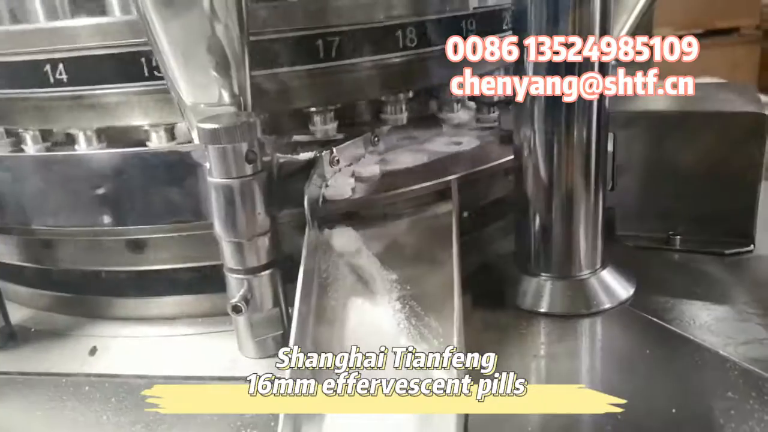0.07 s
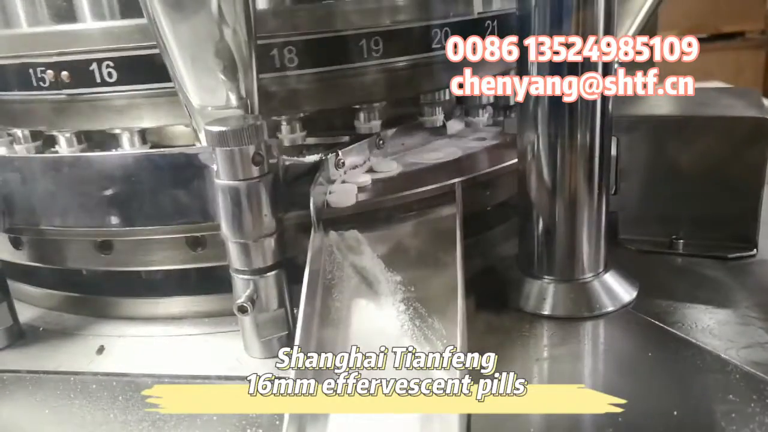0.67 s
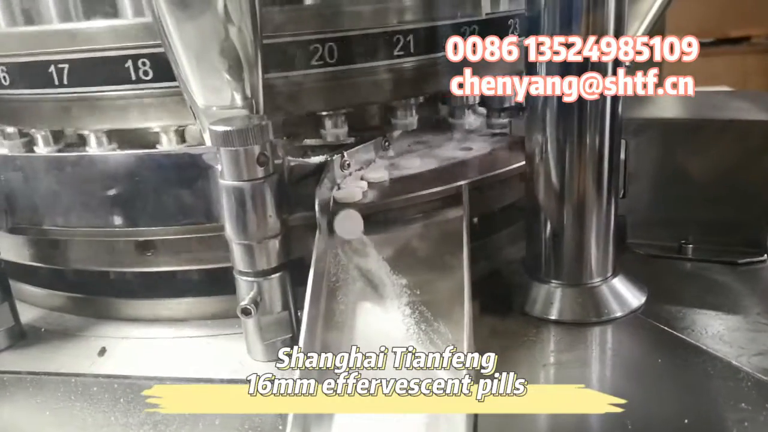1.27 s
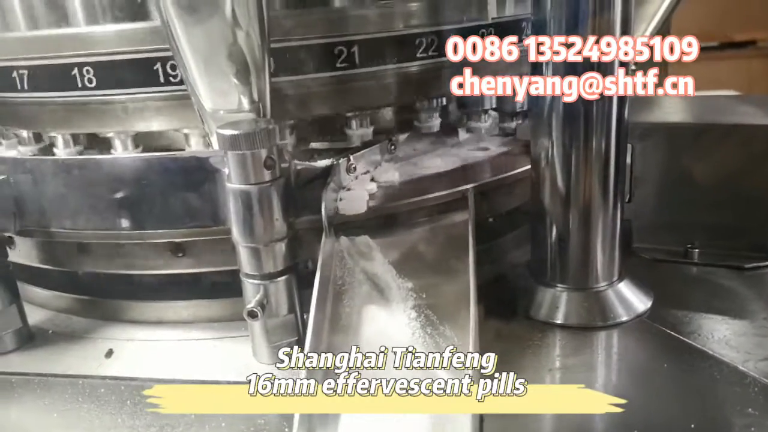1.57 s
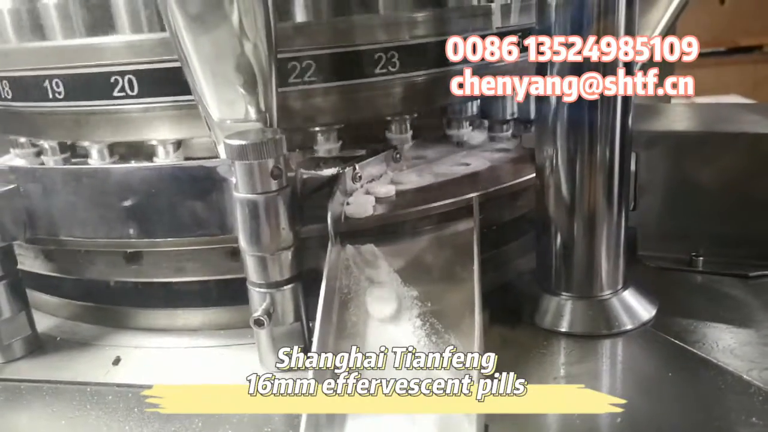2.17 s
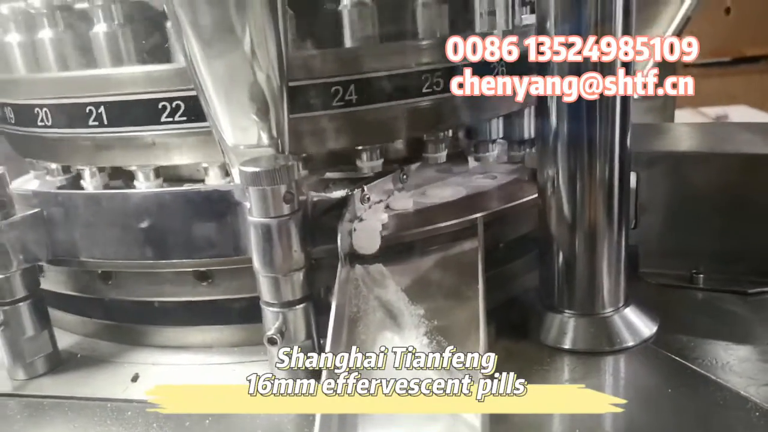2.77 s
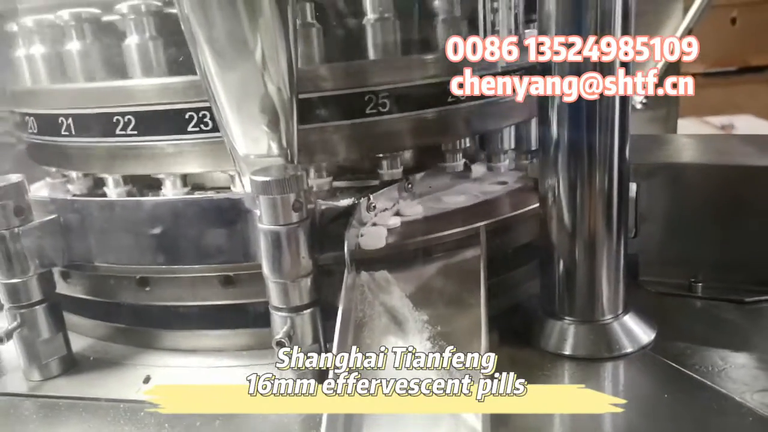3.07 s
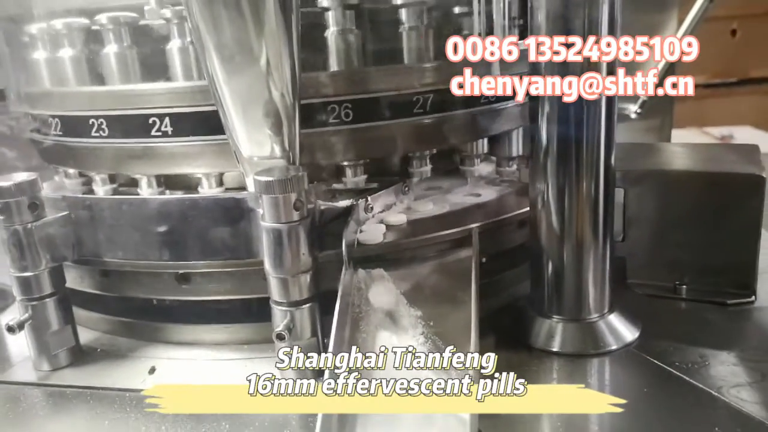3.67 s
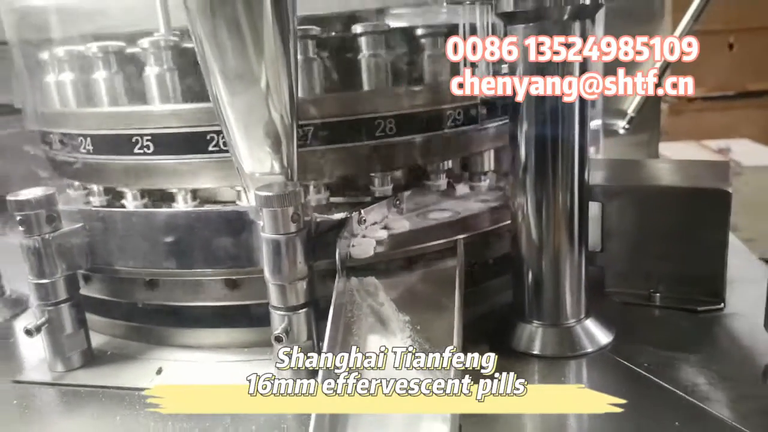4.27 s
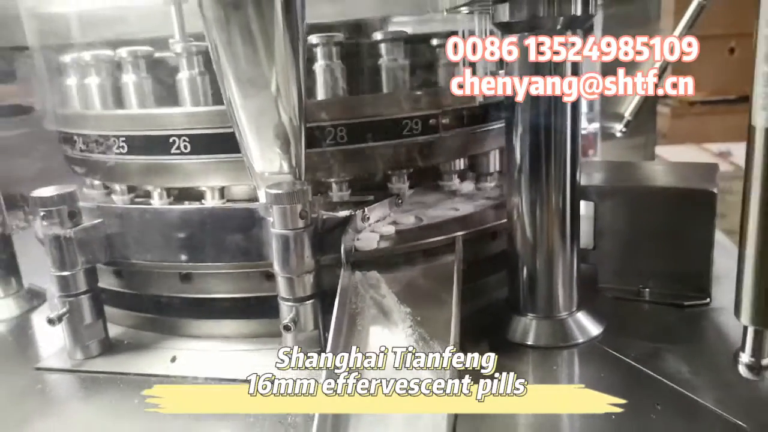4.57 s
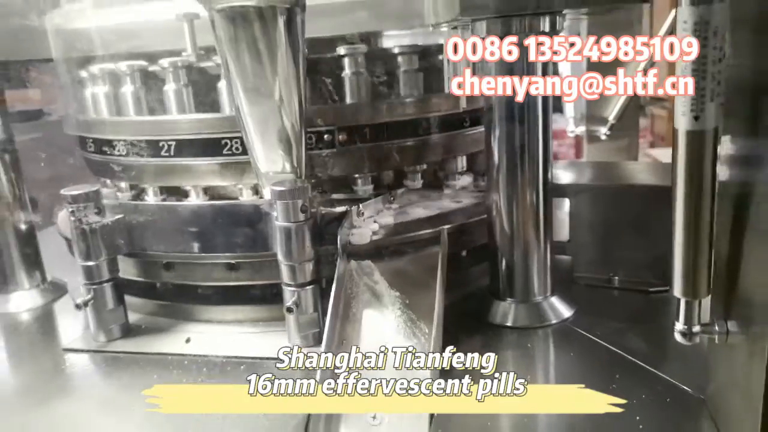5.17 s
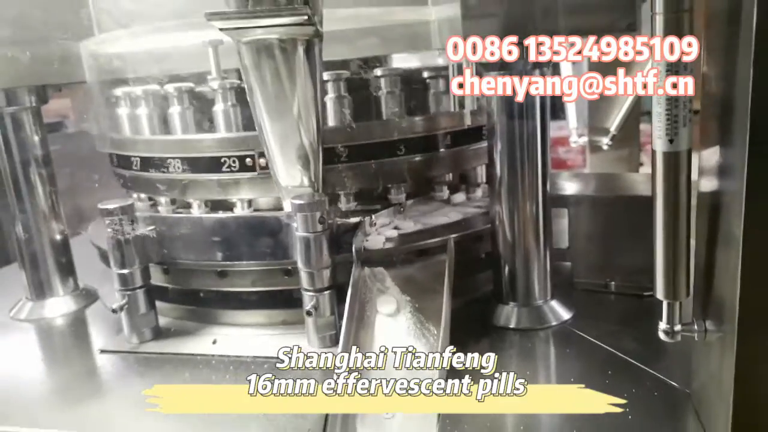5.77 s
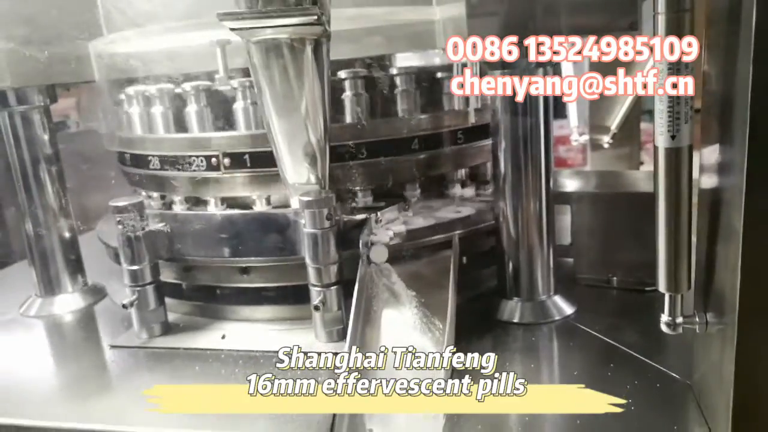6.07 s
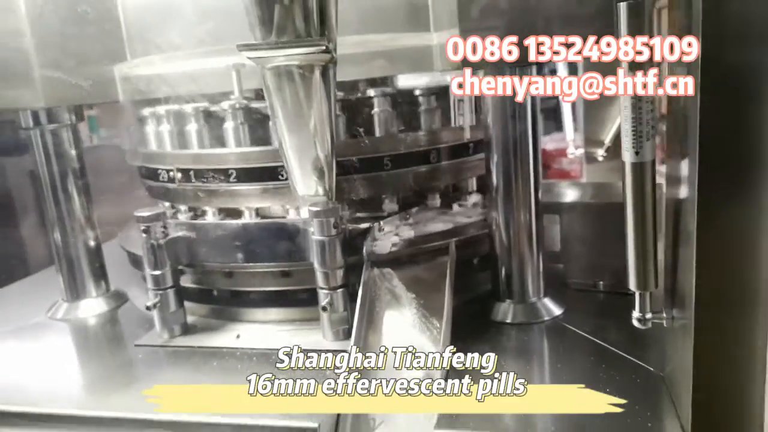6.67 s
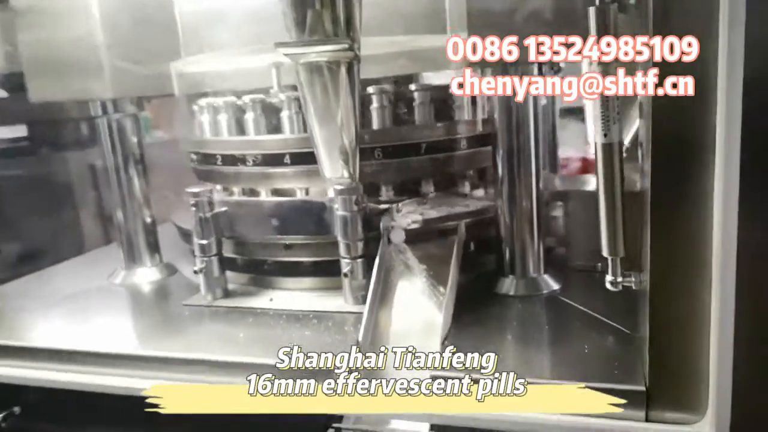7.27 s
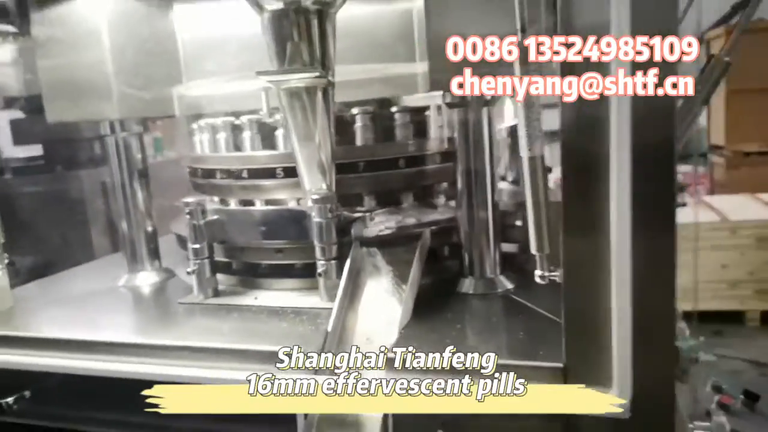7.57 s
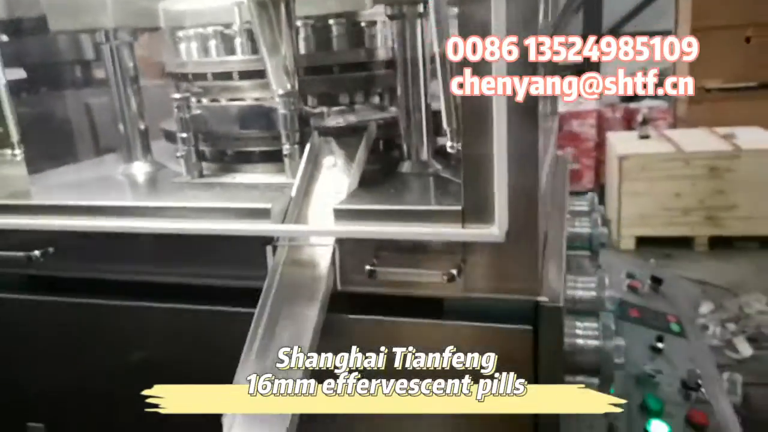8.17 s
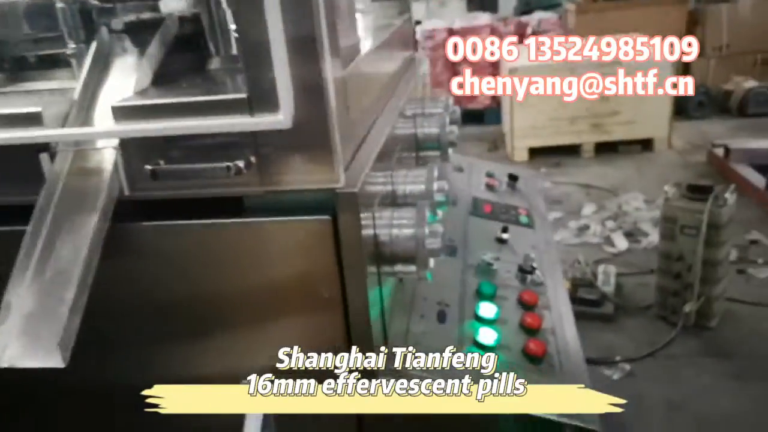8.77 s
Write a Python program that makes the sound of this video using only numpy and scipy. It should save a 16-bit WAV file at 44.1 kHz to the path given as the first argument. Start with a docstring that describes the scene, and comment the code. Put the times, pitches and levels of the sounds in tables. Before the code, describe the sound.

A running tablet press drones with a quick low throb and metallic rubbing, as tablets drop with sharp, irregular clicks on a metal chute.

```python
"""A workshop, just in front of the open cabinet of a rotary press that squeezes powder into tablets.
The drive hums and throbs five times a second while the frame rumbles and the turning turret rubs.
Steel punches (the rods that press the powder) scrape and knock, and loose parts clink.
Air hisses and whistles through a gap, and the inverter that powers the motor whines.
The main sound is hard tablets clicking against a steel chute, which rings briefly after each hit."""
import sys
import numpy as np
from scipy import signal
from scipy.fft import rfft, irfft, next_fast_len
from scipy.io import wavfile
from scipy.ndimage import uniform_filter1d

SR = 44100
rng = np.random.default_rng(int(sys.argv[2]) if len(sys.argv) > 2 else 0)


def unload_wav(signal):
    """Save mono or channel-first audio to the path in sys.argv[1] as 16-bit WAV at rate SR, clipped to [-1, 1]."""
    wavfile.write(
        sys.argv[1],
        SR,
        np.round(np.clip(np.atleast_2d(signal).T, -1, 1) * 32767).astype(np.int16),
    )


N = 393372
TIME = np.arange(N) / SR

# Tone colours, or how strong each frequency is in a noise: f/Hz, level/dB
CABINET_COLOUR = [(90, -30), (150, -2.5), (195, 0), (230, 0), (272, 3.5), (350, -7), (500, -18.5),
                  (1200, -73)]  # the cabinet's low drone
RUB_COLOUR = [(200, -25), (380, -8.5), (550, -3), (900, -1), (1550, -0.5), (1900, -2), (2090, 0),
              (2300, -1.5), (2650, -4.5), (3300, -14), (6000, -26), (12000, -53)]  # steel sliding on steel
HISS_COLOUR = [(500, -8), (2500, 0), (3900, -0.5), (4900, -1.5), (5330, 2), (5700, 0), (6400, -2.5),
               (7500, 0), (8500, -4), (9400, -8), (10100, -24), (15000, -33)]  # hissing air
KNOCK_COLOUR = [(250, -35), (550, -0.5), (1000, 6.5), (1600, 7.5), (2150, 11.5), (2700, 7), (3400, -2.5),
                (4500, -2.5), (7500, -49)]  # a knocked punch
SHEET_COLOUR = [(250, -22), (500, 15), (1000, 5), (2000, 13.5), (3300, 0), (5500, 3), (7700, 6.5),
                (9500, 2), (12000, -14), (15000, -17)]  # sheet metal around the chute


def gain_of(db):
    """Turns decibels into a number to multiply a sound by."""
    return 10 ** (np.asarray(db) / 20)


def evened(x):
    """Scales a signal to an average strength (rms) of 1."""
    return x / np.sqrt(np.mean(x ** 2) + 1e-20)


def read(points, hz):
    """Looks up hz in a table of (frequency, value), on a scale where all octaves are equally wide."""
    f, value = np.transpose(points)
    return np.interp(np.log(hz + 1), np.log(f + 1), value)


def curves(rows):
    """Joins the rows of a timed table with straight lines, giving one curve per value column."""
    s, *columns = np.transpose(rows)
    return [np.interp(TIME, s, column) for column in columns]


def add(mix, s, sound):
    """Mixes a sound in, starting at s seconds."""
    part = mix[:, max(round(s * SR), 0):][:, :sound.shape[1]]
    part += sound[:, :part.shape[1]]


def rising(t, rise_s):
    """A quick, smooth rise from 0 to 1."""
    return 1 - np.exp(-t / rise_s)


def dying(t, t60):
    """A fade that loses 60 dB in t60 seconds."""
    return np.exp(-np.log(1000) * t / t60)


def wander(per_s):
    """A smooth random drift with up to about per_s wiggles a second."""
    size = next_fast_len(N, real=True)
    hz = np.fft.rfftfreq(size, 1 / SR)
    slow_part = rfft(rng.standard_normal(size)) * np.exp(-(hz / per_s) ** 2)
    return evened(irfft(slow_part, size)[:N])


def rattle(size, gap_s, depth_db):
    """The uneven loudness of parts that touch and separate about every gap_s seconds."""
    jolts = np.clip(rng.standard_normal(400), -2, 2)
    position = np.arange(size) / SR / gap_s
    return evened(gain_of(depth_db * np.interp(position, np.arange(400), jolts)))


def bandpass(x, edges_hz):
    """Keeps the part of x between two frequencies."""
    return signal.sosfilt(signal.butter(5, edges_hz, btype="band", fs=SR, output="sos"), x)


def coloured(x, db):
    """Turns each frequency up or down by db without smearing sound earlier, so hits stay sharp."""
    log_gain = np.log(gain_of(np.concatenate([db, db[-2:0:-1]])))
    response = np.exp(signal.hilbert(log_gain).conj())[:len(db)]
    return irfft(rfft(x) * response)


def noise(colour, size=N, likeness=None):
    """Stereo noise of a given tone colour; the two ears hear alike in the bass, less so higher up."""
    # how alike the ears hear the machine: f/Hz, likeness (0 to 1)
    usual_likeness = [(40, 1), (110, 0.97), (200, 0.95), (300, 0.75), (640, 0), (1400, 0.34), (3000, 0),
                      (15000, 0)]
    # how much louder the left ear is: f/Hz, left minus right/dB
    balance = [(300, 0), (700, -1.5), (1300, -2), (2300, -5), (3000, 3), (4300, -2.5), (8000, 4.5),
               (12000, -4)]
    hz = np.fft.rfftfreq(size, 1 / SR)
    left, other = rfft(rng.standard_normal((2, size)))
    same = read(likeness or usual_likeness, hz)
    right = same * left + np.sqrt(1 - same ** 2) * other
    db = read(colour, hz) + np.array([[.5], [-.5]]) * read(balance, hz)
    return evened(irfft(np.array([left, right]) * gain_of(db), size))


def ringing(colour, hz, size, width, peak_db):
    """Noise in which one ringing pitch stands out; width is a fraction of that pitch."""
    grid_hz = np.geomspace(100, 16000, 200)
    ring_db = peak_db / (1 + (np.log(grid_hz / hz) / width) ** 2)
    return noise(np.transpose([grid_hz, read(colour, grid_hz) + ring_db]), size)


def fuzzy_tone(hz, width_hz):
    """A narrow band of noise around one pitch."""
    phase = 2 * np.pi * np.cumsum(hz * np.ones(N)) / SR
    return wander(width_hz) * np.cos(phase) + wander(width_hz) * np.sin(phase)


def room_echo(x):
    """The workshop's wash of echoes, in which each frequency dies away at its own speed."""
    # how long the room rings: f/Hz, t60/s
    ring_times = [(200, 0.14), (1000, 1), (4000, 0.1), (8000, 0.52), (11000, 0.15)]
    hz, t, bands = signal.stft(rng.standard_normal((2, SR // 2)), SR, nperseg=256)
    fade = dying(t, read(ring_times, hz)[:, None]) * rising(t, rise_s=.016)
    tail = signal.istft(bands * fade, SR, nperseg=256)[1]
    return signal.fftconvolve(x, tail / np.linalg.norm(tail[0]), axes=1)[:, :N]


def air_hiss(level_db=-45.5):
    """Air hisses with a slight flutter."""
    return gain_of(level_db + wander(36)) * noise(HISS_COLOUR)


def inverter_whine(fuzz_db=-66):
    """The motor's power is switched very fast, making two high tones, the upper one fuzzy."""
    # switching tones: f/Hz, level/dB
    tones = [(5330, -64), (10667, -70)]
    fuzz = gain_of(fuzz_db) * fuzzy_tone(tones[-1][0], width_hz=200)
    return fuzz + np.sqrt(2) * sum(gain_of(db) * np.sin(2 * np.pi * hz * TIME) for hz, db in tones)


def air_whistle(gain_db=8.5, lull_s=.39, lull_db=-10):
    """Air whistles through a gap; twice it breaks off, returns as a higher hiss and slides back."""
    # the undisturbed whistle: t/s, f/Hz, level/dB
    at_rest = [(0, 7760, -59.5), (2.2, 7300, -65), (3.4, 7380, -65), (5, 7830, -59), (7.5, 7640, -58),
               (8.92, 8400, -65)]
    # its returns after a lull: t/s, length/s, pitch jump/Hz, level change/dB
    slides = [(3.99, 0.5, 1600, 7.5), (5.757, .65, 1800, -9)]
    hz, db = curves(at_rest)
    purity = .8
    for s, length_s, jump_hz, change_db in slides:
        upset = np.interp(TIME - s, [-lull_s, 0, length_s], [0, 1, 0])
        hz += jump_hz * upset
        purity *= (1 - upset) ** 2
        stages_s = [-lull_s, -lull_s / 2, 0, length_s / 4, length_s]
        db += np.interp(TIME - s, stages_s, [0, lull_db, lull_db, change_db, 0])
    clear = purity * fuzzy_tone(hz, width_hz=110)
    breathy = np.sqrt(1 - purity ** 2) * fuzzy_tone(hz, width_hz=560)
    return gain_of(db + gain_db) * (clear + breathy)


def frame_rumble(gain_db=4, drone_db=-44):
    """The shaking frame rumbles deeply and the cabinet drones above it."""
    # tone colour of the rumble: f/Hz, level/dB
    colour = [(5, -22), (17, 3), (23, 3), (35, -5), (56, -0.5), (68, -9.5), (82, -12.5), (105, -12.5),
              (130, -4.5), (160, -12.5), (220, -21.5), (500, -83)]
    # strength of the rumble: t/s, level/dB
    levels = [(0, -39.5), (1.12, -40), (1.46, -35), (2.01, -38.5), (8.92, -40)]
    rumble = gain_of(curves(levels)[0] + gain_db) * noise(colour)
    return rumble + gain_of(drone_db) * noise(CABINET_COLOUR)


def shudder(width_s=.08):
    """A gain for the low sounds, which swell briefly when the frame shudders under load."""
    # shudders: t/s, extra level/dB
    swells = [(1.64, 4), (3.06, 4.5), (5.61, 1), (7.9, 3.5)]
    return gain_of(sum(db * np.exp(-((TIME - s) / width_s) ** 2) for s, db in swells))


def turret_rub(gain_db=-1.55, patch_db=1.8):
    """Sliding punches make the turret rub unevenly, now in one range of pitch, now in another."""
    # strength of the rubbing: t/s, level/dB
    levels = [(0, -43.5), (1.8, -43), (2.45, -39.5), (3.3, -43.5), (5.1, -44), (6.3, -44.5), (8.92, -41.5)]
    edges_hz = np.geomspace(200, 9000, 10)
    sliding = noise(RUB_COLOUR)
    rub = sum(bandpass(sliding, band) * gain_of(patch_db * wander(14))
              for band in zip(edges_hz, edges_hz[1:]))
    return rub * gain_of(curves(levels)[0] + gain_db + wander(36))


def drive_hum(pitch_hz=104.2, glide_hz=6.5, turn_s=.1976, first_throb_s=.145, start_db=-29.5):
    """The gears' hum swells and slides upward once per turn of the shaft; no two throbs are equal."""
    turns = (TIME - first_throb_s) / turn_s
    hz = pitch_hz + glide_hz * np.sin(2 * np.pi * turns) + 2 * wander(8.7)
    throb = 1 - .75 * np.sin(np.pi * turns) ** 2
    flutter = 1 + .21 * wander(28)
    db = start_db - .63 * TIME + wander(.5 / turn_s)  # fades as the listener backs away
    return gain_of(db) * throb * flutter * np.sqrt(2) * np.sin(2 * np.pi * np.cumsum(hz) / SR)


def rustle(crackle_db=3, band_hz=(2500, 15000)):
    """A soft, bright, crackly rustle close by, at the very end."""
    # strength of the rustle: t/s, level/dB
    levels = [(8.72, -77), (8.82, -42.5), (8.92, -38.5)]
    db = curves(levels)[0] + crackle_db * wander(200)
    return gain_of(db) * evened(bandpass(noise(SHEET_COLOUR), band_hz))


def roller_bumps():
    """A punch passes under the pressing rollers with a soft, low bump."""
    # bumps: t/s, level/dB
    bumps = [(0.619, -34), (2.22, -29.5), (3.8, -30.5), (4.971, -30)]
    out, t = np.zeros((2, N)), np.arange(SR // 3) / SR
    for s, db in bumps:
        body = evened(bandpass(noise(CABINET_COLOUR, len(t)), edges_hz=(260, 650)))
        add(out, s, gain_of(db) * rising(t, rise_s=.0024) * dying(t, t60=.42) * body)
    return out


def punch_scrapes(gain_db=4, bite_db=-2, hold_s=.025):
    """A punch bites on the cam (the track that lifts it), then scrapes over it with a gritty chuff."""
    # scrapes: t/s, level/dB, ringing f/Hz
    scrapes = [(0.143, -39.5, 2120), (0.37, -39, 2020), (1.533, -41, 2280), (1.72, -37, 2100),
               (1.945, -40, 2070), (2.172, -40.5, 2020), (2.72, -37, 1650), (2.908, -38.5, 2180),
               (3.305, -44, 1930), (3.715, -43.5, 1970), (4.005, -43, 1690), (4.222, -46, 2140),
               (4.3, -40.5, 1400), (4.49, -40.5, 2100), (4.715, -41, 1510), (4.89, -39.5, 2140),
               (5.1, -39, 1550), (5.285, -41, 2150), (5.47, -40.5, 1780), (5.89, -47, 1530),
               (6.485, -43.5, 1580), (6.655, -38.5, 1800), (6.858, -40.5, 2300), (7.25, -44, 2160),
               (7.48, -43, 1420), (7.765, -46.5, 2050), (7.955, -45, 1730)]
    out, t = np.zeros((2, N)), np.arange(SR // 4) / SR
    slide_fade = dying(np.maximum(t - hold_s, 0), t60=.46)
    for s, db, hz in scrapes:
        slide = slide_fade * ringing(RUB_COLOUR, hz, len(t), width=.047, peak_db=11)
        bite = gain_of(bite_db) * dying(t, t60=.064) * noise(KNOCK_COLOUR, len(t))
        grit = rattle(len(t), gap_s=.004, depth_db=3.5)
        add(out, s, gain_of(db + gain_db) * rising(t, rise_s=.0013) * grit * (slide + bite))
    return out


def steel_clinks(gain_db=8, pitch_hz=1950):
    """Loose steel parts clink lightly, each time at a slightly different pitch."""
    # clinks: t/s, level/dB
    clinks = [(1.2525, -36.5), (1.842, -28.5), (2.058, -29.5), (2.26, -26), (3.603, -34), (3.633, -30.5),
              (3.686, -34), (5.0715, -36), (7.6516, -34.5)]
    out, t = np.zeros((2, N)), np.arange(SR // 10) / SR
    for s, db in clinks:
        hz = pitch_hz * (1 + .09 * rng.standard_normal())
        steel = ringing(KNOCK_COLOUR, hz, len(t), width=.08, peak_db=10)
        add(out, s, gain_of(db + gain_db) * rising(t, rise_s=.0005) * dying(t, t60=.041) * steel)
    return out


def punch_knocks(gain_db=-6, pitch_hz=2260):
    """Punches knock in their guides, then ring and rattle briefly."""
    # knocks: t/s, level/dB
    knocks = [(1.055, -20), (1.3082, -23), (2.223, -18.5), (2.4621, -21), (2.5107, -23), (3.7957, -20),
              (6.0813, -25.5), (6.782, -20), (7.0876, -21.5), (7.394, -25), (8.1966, -23)]
    out, t = np.zeros((2, N)), np.arange(SR // 3) / SR
    shape = rising(t, rise_s=.000058) * dying(t, t60=.22)
    for s, db in knocks:
        hz = pitch_hz * (1 + .07 * rng.standard_normal())
        steel = ringing(KNOCK_COLOUR, hz, len(t), width=.03, peak_db=8)
        add(out, s, gain_of(db + gain_db) * shape * rattle(len(t), gap_s=.004, depth_db=3) * steel)
    return out


def tablet_nudges(gain_db=-4.5, pitch_hz=5500, band_hz=(1500, 9000), chips_db=-57, chips_per_s=30):
    """Tablets tick against each other over a faint, random jostling of powder and chips."""
    # nudges on the guide that leads the tablets out: t/s, level/dB
    nudges = [(0.2962, -24), (0.341, -23), (0.3632, -21.5), (0.488, -25), (0.986, -23), (1.017, -18.5),
              (1.374, -20.5), (1.583, -23), (1.7588, -20), (2.056, -15), (2.259, -32), (2.386, -19),
              (2.5102, -19.5), (2.736, -26), (3.1326, -20.5), (3.248, -23), (3.284, -27.5), (3.359, -22),
              (3.686, -26), (3.715, -24), (4.054, -22), (4.125, -25), (5.126, -26.5), (6.238, -10.5),
              (7.1065, -20), (7.199, -24), (7.7012, -13), (8.469, -20.5), (8.659, -15), (8.727, -22),
              (8.863, -18.5)]
    t = np.arange(SR // 10) / SR
    tick = rising(t, rise_s=.0003) * dying(t, t60=.033)
    chip_sizes = gain_of(4.5 * np.minimum(rng.exponential(1, N), 2))
    chip_hits = chip_sizes * (rng.random(N) < chips_per_s / SR)
    jostling = evened(signal.oaconvolve(chip_hits, tick)[:N])
    out = gain_of(chips_db) * jostling * evened(bandpass(noise(SHEET_COLOUR), band_hz))
    for s, db in nudges:
        hz = pitch_hz * np.exp(.25 * rng.standard_normal())
        body = ringing(SHEET_COLOUR, hz, len(t), width=.1, peak_db=8)
        add(out, s, gain_of(db + gain_db) * tick * evened(bandpass(body, band_hz)))
    return out


def rim_pings(pitch_hz=6070):
    """A tablet grazes the rim of the chute, which gives a thin, clear ping."""
    # pings: t/s, level/dB
    pings = [(0.448, -27), (5.985, -44)]
    out, t = np.zeros((2, N)), np.arange(SR // 5) / SR
    for s, db in pings:
        add(out, s, gain_of(db) * dying(t, t60=.1) * np.sin(2 * np.pi * pitch_hz * t)[None])
    return out


def chute_ring(t, spot_db=4.5, detune=.035, sheet_db=5, echoes_db=-6, tail_db=-26):
    """One tap on the chute: its own tones, close echoes off the sheet metal and a crumbly tail."""
    # the chute's tones: f/Hz, t60/s, level/dB, left minus right/dB, left phase lead/rad
    chute_tones = [(456, 0.032, 1, -7, -1.38), (664, 0.032, -6, -7, -0.89), (1130, 0.046, -14, -3, 0.42),
                   (1576, 0.035, -8, -10.5, -0.18), (1773, 0.031, -1.5, -3.5, -1.1),
                   (2081, 0.037, 4, -7.5, 1), (2294, 0.019, -1.5, 6, 1), (2555, 0.029, -3.5, 2, 1),
                   (4110, .03, -14, -14, 1), (5380, 0.014, -8.5, -22, 0.87), (7400, 0.021, -7.5, -8, -0.9),
                   (7950, 0.0014, 17, -6.5, -1.1)]
    # how alike the ears hear a close sound: f/Hz, likeness (0 to 1)
    close_likeness = [(300, 0.71), (1700, 0.12), (2600, 0.24), (5000, 0.12)]
    hz, t60, db, balance_db, lead = np.transpose(chute_tones)[:, :, None]
    spot, shift = rng.standard_normal((2, len(chute_tones), 1))  # each spot hit favours other tones
    side = np.array([.5, -.5])[:, None, None]
    strength = gain_of(db + spot_db * spot + side * balance_db) * dying(t, t60)
    tones = (strength * np.sin(2 * np.pi * hz * (1 + detune * shift) * t + side * lead)).sum(1)
    crumbly = rattle(len(t), gap_s=.003, depth_db=5)
    tail = gain_of(tail_db) * dying(t, t60=.2) * crumbly * noise(HISS_COLOUR, len(t))
    echo_fade = gain_of(sheet_db) * dying(t, t60=.007) + gain_of(echoes_db) * dying(t, t60=.026)
    echoes = echo_fade * noise(SHEET_COLOUR, len(t), close_likeness)
    return (tones + tail + echoes) * rising(t, rise_s=.0002)


def tablet_click(chatter_s, snap_hz, band_levels_db, rebound=.55, snap_db=6, attack_s=.012):
    """A tablet lands and bounces three times; a flat landing thuds, one on the edge snaps."""
    # pitch ranges of the thud, clack, ring, crack and snap: lowest f/Hz, highest f/Hz
    bands = [(340, 1000), (1000, 1850), (1850, 3000), (3000, 6500), (6500, 16000)]
    t = np.arange(4096) / SR
    hz = np.fft.rfftfreq(len(t), 1 / SR)
    ring = chute_ring(t)
    for delay_s in rng.uniform(.2, 1, 3) * chatter_s:
        add(ring, delay_s, rebound * chute_ring(t))
    ring = coloured(ring, snap_db / (1 + ((hz / snap_hz - 1) / .063) ** 2))  # a peak at the snap
    # bring each band to its level, counting its energy as if it all came within attack_s
    power = (abs(rfft(ring)) ** 2).mean(0) * 2 / len(t) / (attack_s * SR)
    gains_db = [db - 10 * np.log10(power[(hz >= low) & (hz < high)].sum())
                for (low, high), db in zip(bands, band_levels_db)]
    steps_db = np.interp(hz, np.ravel(bands), np.repeat(gains_db, 2))
    bass_cut_db = -10 * np.log10(1 + (310 / (hz + 30)) ** 8)  # the small chute gives off no bass
    return coloured(ring, bass_cut_db + uniform_filter1d(steps_db, size=17))


def tablets_on_chute(gain_db=1):
    """Tablets click on the chute, which ends up to the left as the listener steps back and turns."""
    # landings: t/s, chatter length/s, snap f/Hz, then level/dB of thud, clack, ring, crack and snap
    landings = [(0.2511, 0.00072, 5750, -32.5, -28.5, -25, -24, -21),
                (0.448, 0.0036, 6130, -52, -38.5, -29.5, -30, -33),
                (0.5773, .0014, 8300, -21.5, -29, -16, -23, -22),
                (0.7954, 0.00091, 5130, -49, -52, -32, -29, -47),
                (0.8391, 0.00094, 7490, -51, -25.5, -18, -46, -21.5),
                (0.879, 0.0026, 7600, -24, -27.5, -18.5, -26.5, -16.5),
                (1.1725, .0027, 7260, -23, -25.5, -18, -26.5, -24.5),
                (1.9147, 0.0029, 7540, -30, -33.5, -29, -23.5, -21.5),
                (2.032, 0.0022, 5330, -31, -24.5, -23, -23.5, -23),
                (2.1413, 0.0017, 6270, -36.5, -31, -30, -26.5, -39),
                (2.3646, 0.0049, 8140, -30.5, -36, -25.5, -25, -28),
                (2.985, 0.00071, 7240, -30, -32.5, -22, -21, -19.5),
                (3.154, 0.0022, 7300, -28, -27.5, -20.5, -18, -13.5),
                (3.545, .0016, 6800, -24, -21, -18.5, -24.5, -22.5),
                (3.973, .0012, 7000, -33, -24, -21.5, -24.5, -19.5),
                (4.3477, 0.0024, 5360, -26.5, -19.5, -23.5, -22, -21),
                (5.0279, 0.003, 7850, -26, -24, -21.5, -23, -15.5),
                (5.327, .005, 5650, -30, -20, -19.5, -19, -22),
                (5.7073, .0037, 6900, -24, -18.5, -19.5, -17, -14),
                (6.2424, 0.0011, 7560, -38, -29, -24.5, -23, -18.5),
                (6.594, 0.0017, 4700, -25.5, -19.5, -17.5, -17.5, -22.5),
                (6.961, 0.0015, 7500, -23, -30, -24.5, -24.5, -18.5),
                (7.5292, 0.0023, 6260, -39, -25.5, -20.5, -21, -22.5),
                (7.598, 0.0017, 7740, -23.5, -25, -20.5, -28, -23),
                (8.1664, 0.0018, 5080, -38, -28.5, -25, -26.5, -46),
                (8.4451, .0022, 7490, -63, -31.5, -22.5, -37, -31.5),
                (8.6151, .0016, 7800, -31, -26, -26.5, -23.5, -20)]
    # direction of the chute: t/s, left minus right/dB
    direction = [(0, 2), (4.3, 1), (5.1, 3), (7.6, 2.5), (8.6, 9.5)]
    out = np.zeros((2, N))
    for s, chatter_s, snap_hz, *band_levels_db in landings:
        add(out, s, tablet_click(chatter_s, snap_hz, band_levels_db))
    return gain_of(gain_db + np.array([[.5], [-.5]]) * curves(direction)[0]) * out


def scene(room_db=-24):
    """The running press, with its sharp hits echoing in the room."""
    hits = tablets_on_chute() + punch_knocks() + steel_clinks() + rim_pings()
    low_sounds = shudder() * (drive_hum() + frame_rumble())
    running = low_sounds + turret_rub() + air_hiss() + punch_scrapes() + roller_bumps()
    whines = np.array([air_whistle() + inverter_whine() for ear in range(2)])
    return hits + gain_of(room_db) * room_echo(hits) + tablet_nudges() + rustle() + running + whines


def record(dry, threshold_db=-25, recovery_db_per_s=80, attack_s=.0084, top_hz=16200):
    """Gain control dips the level after loud clicks, the bass most; peaks and the top treble are cut."""
    power = uniform_filter1d((dry ** 2).mean(0), size=128)
    power_db = 10 * np.log10(abs(power) + 1e-12)
    fall_db = TIME * recovery_db_per_s
    held_db = np.maximum.accumulate(power_db + fall_db) - fall_db  # each peak sinks back steadily
    over_db = np.maximum(held_db - threshold_db, 0)
    lag = np.exp(-1 / (attack_s * SR))
    smooth_over_db = signal.lfilter([1 - lag], [1, -lag], over_db)
    bass = signal.sosfiltfilt(signal.butter(2, 400, fs=SR, output="sos"), dry)
    dipped = bass / gain_of(.35 * smooth_over_db) + (dry - bass) / gain_of(.086 * smooth_over_db)
    treble_cut = signal.firwin(511, top_hz, window=("kaiser", 9), fs=SR)
    return signal.oaconvolve(np.clip(dipped, -1, 1), treble_cut[None], "same")


dry = scene()
out = record(dry)
unload_wav(out)
```